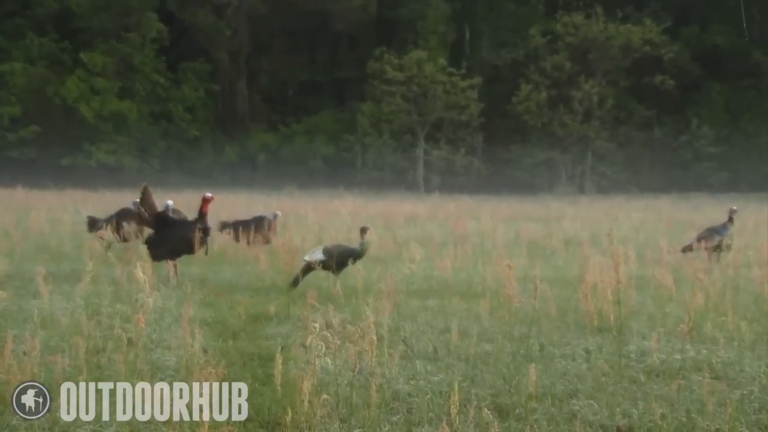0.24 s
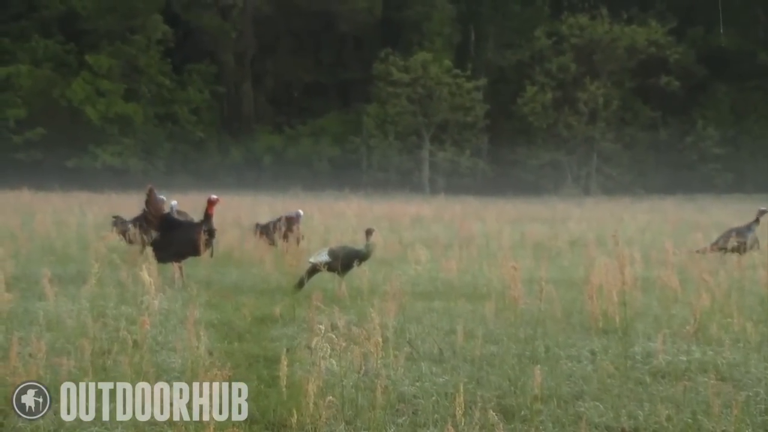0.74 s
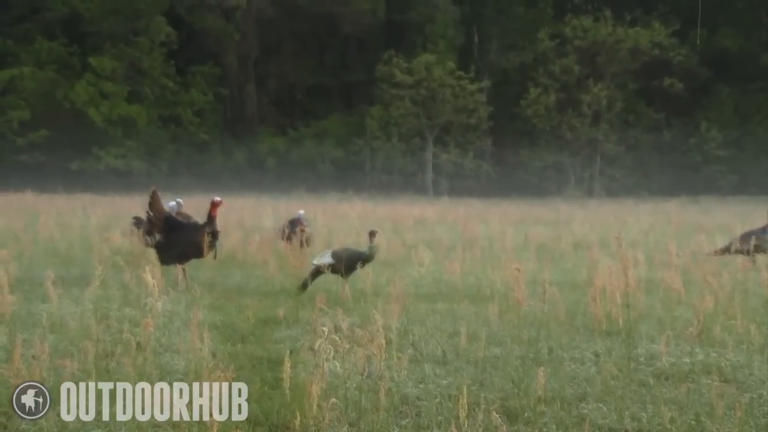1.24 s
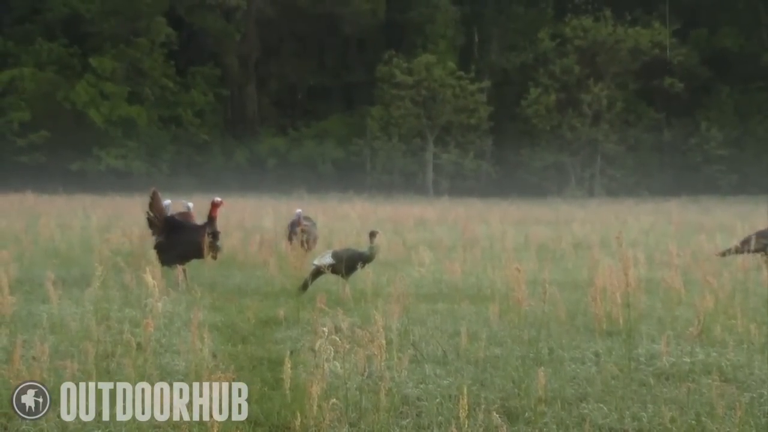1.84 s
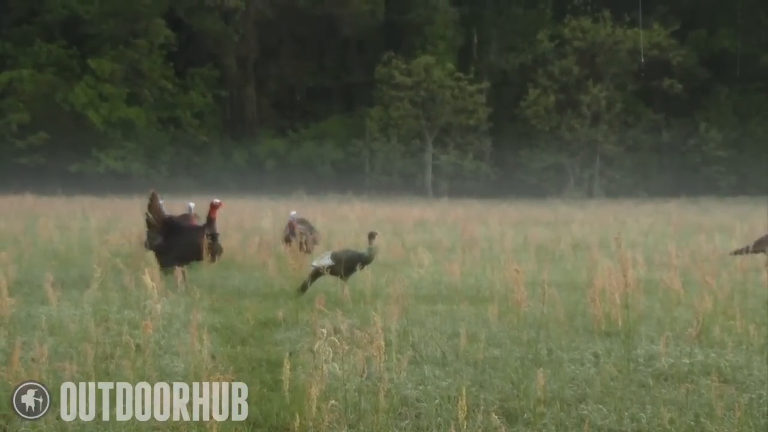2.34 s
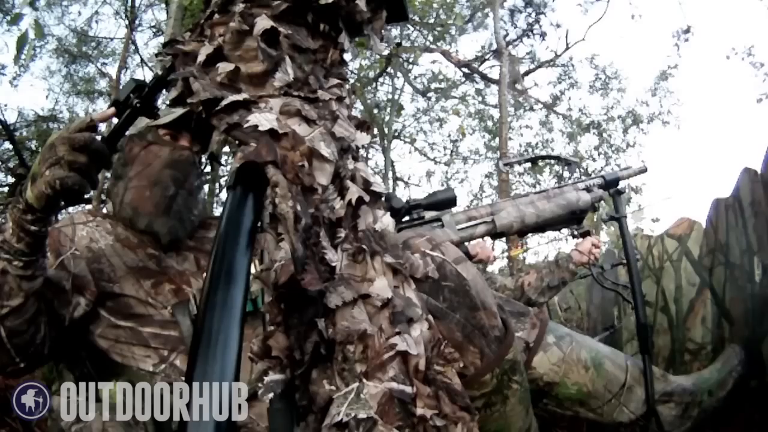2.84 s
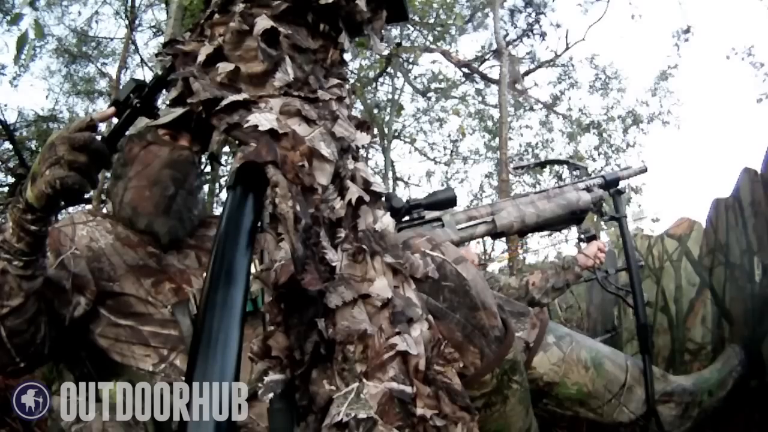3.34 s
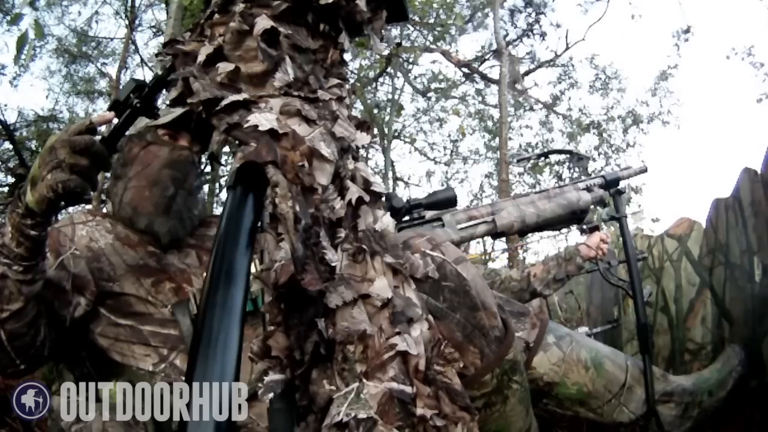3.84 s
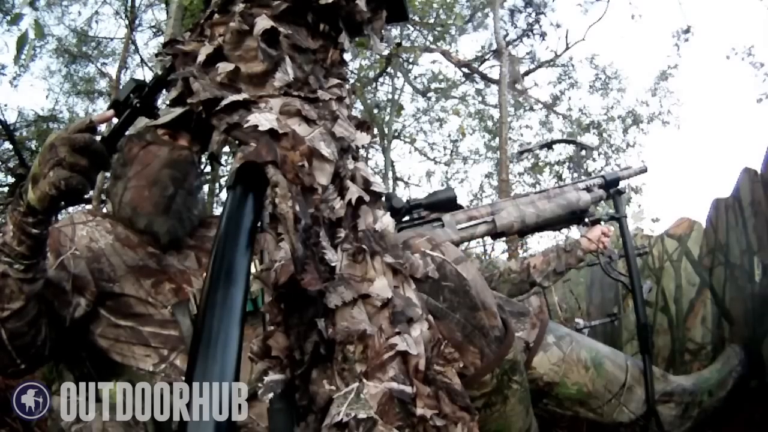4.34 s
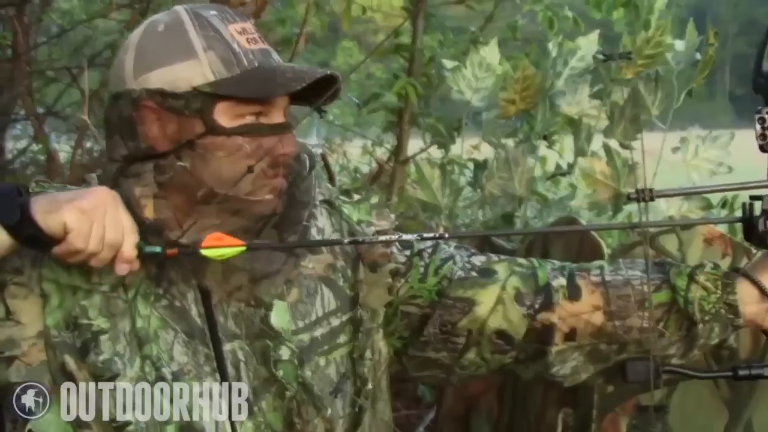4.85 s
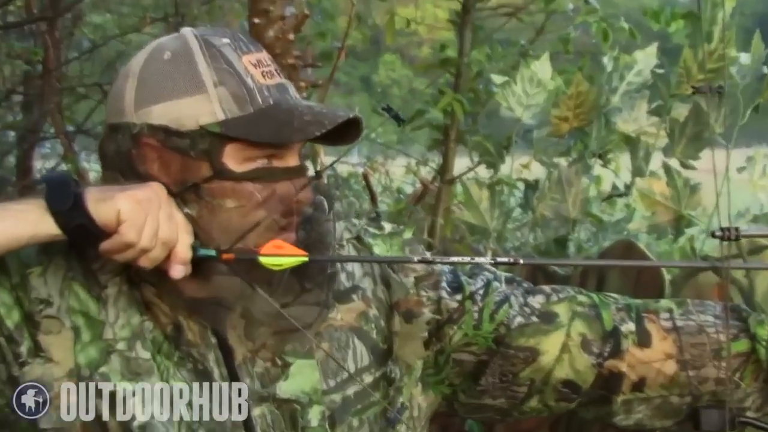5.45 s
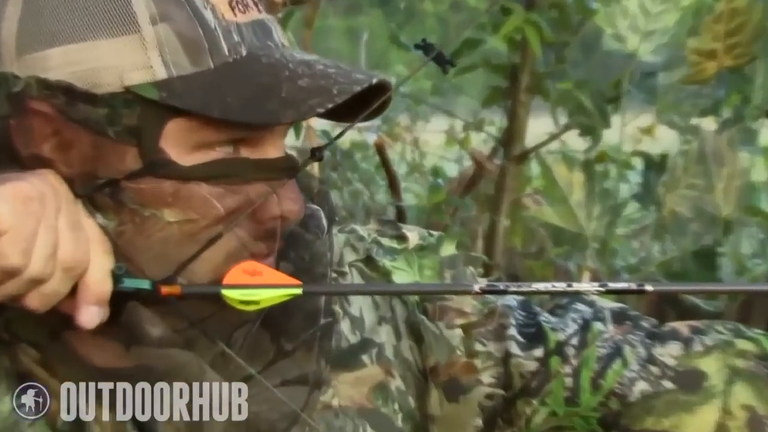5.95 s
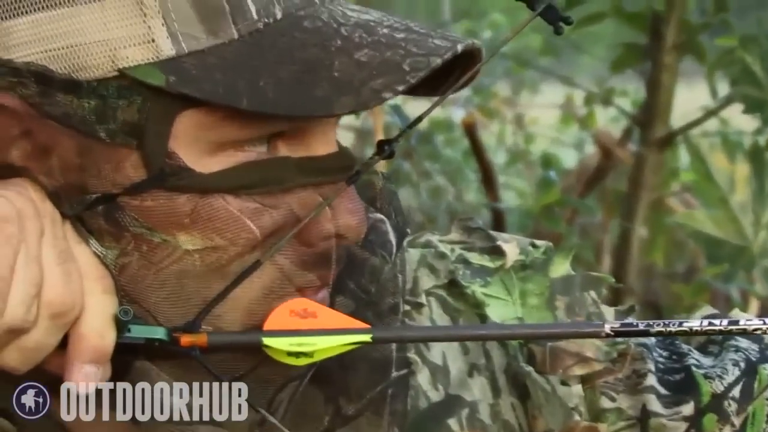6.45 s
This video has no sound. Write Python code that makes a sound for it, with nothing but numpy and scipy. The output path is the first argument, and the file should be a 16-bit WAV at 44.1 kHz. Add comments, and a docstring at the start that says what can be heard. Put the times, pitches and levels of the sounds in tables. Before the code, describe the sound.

Close, dry-sounding turkey yelps dominate the first half, in two evenly paced runs swelling from soft and clear to loud and raspy. Tiny gliding songbird notes sit far behind. Once the yelping stops, the quiet outdoor background emerges: steady low hum, soft air, sparse chirps, small twig-like ticks and knocks, and late on a hoarse, distant bird rattle.

```python
"""At the edge of a wood, a run of wild turkey yelps, growing louder and harsher overall, is heard twice. Each
yelp is a pulsed tone that dips in pitch and breaks into a rasp, shaped by resonances and hollows; the trees
return a faint diffuse tail. Far off, small birds sing gliding tones and a hoarse bird calls in strings of noise
notes. Soft knocks are damped resonances. Beneath lie a low hum of sine tones and the filtered noise of quiet
air."""
import sys
import numpy as np
from scipy import signal
from scipy.fft import rfft, irfft
from scipy.io import wavfile
from scipy.ndimage import uniform_filter1d

SR = 44100
rng = np.random.default_rng(int(sys.argv[2]) if len(sys.argv) > 2 else 0)


def master(y):
    """Save y as 16-bit WAV."""
    cut = np.clip(np.atleast_2d(y).T, -1, 1)
    pcm = np.round(cut * 32767)  # scale
    wavfile.write(sys.argv[1], SR, pcm.astype(np.int16))


N = 294676
TIME = np.arange(N) / SR


def undb(db):
    """Level is logarithmic: decibels to amplitude gain."""
    return 10 ** (np.asarray(db) / 20)


def unit(x):
    """Normalise the mean power: scale to an rms of one."""
    return x / np.sqrt(np.mean(x ** 2) + 1e-20)


def add(out, start, x):
    """Superposition: mix a sound in at a time in seconds."""
    i = max(int(start * SR), 0)
    out[i:i + len(x)] += x[:N - i]


def colour(x, points, peaks=()):
    """Minimum-phase filtering: a causal response is built from the cepstrum of a spectrum with peaks."""
    size = 8192
    f = np.arange(size // 2 + 1) * SR / size + 1
    hz, db = np.transpose(points)
    curve = np.interp(np.log(f), np.log(hz), db)
    for centre, width, gain in peaks:
        curve = curve + gain / (1 + (2 * (f - centre) / width) ** 2)
    # folding the cepstrum onto positive time makes the response causal
    cepstrum = irfft(np.log(undb(curve)))
    cepstrum[1:size // 2] *= 2
    cepstrum[size // 2 + 1:] = 0
    response = irfft(np.exp(rfft(cepstrum)))
    return signal.fftconvolve(x, response)[:len(x)]


def band(n, hz, width):
    """Band-limited noise: a bell-shaped spectrum; a narrow one around 0 Hz gives a slow fluctuation."""
    f = np.arange(SR // 2 + 1)
    spectrum = rfft(rng.standard_normal(SR)) * np.exp(-2 * ((f - hz) / width) ** 2)
    return unit(irfft(spectrum)[:n])


def turkey():
    """Vocal effort: the louder a yelp, the raspier and brighter it is, and the sooner it breaks."""
    # the yelps: start_s, length_s, lowest_pitch_hz, pitch_bend_share, level_db
    yelps = [(0.126, .049, 727.5, .38, -35), (.365, .08, 660, .27, -25), (0.617, .08, 683.3, 0.3, -23.5),
             (0.873, .07, 719, .3, -25), (1.139, .066, 733.7, 0.24, -20.5), (1.401, .059, 737, .26, -19),
             (1.752, 0.055, 663, .1, -41), (2.028, 0.053, 722.5, 0.47, -40),
             (2.266, 0.0795, 656.7, .27, -26), (2.519, .08, 689.6, 0.27, -24),
             (2.775, .07, 719, 0.31, -24.5), (3.041, .066, 733, .25, -20), (3.302, 0.06, 733.5, .26, -19.5)]
    clear_db, harsh_db = -36, -19  # levels between which effort rises to 1
    overtones_db, effort_overtones_db = -5.5, 5.5  # tilt without effort, and what full effort adds
    break_s, break_sooner_s = .031, .014  # delay of the rasp, and its shortening at full effort
    out = np.zeros(N)
    for start, length, low_hz, bend, db in yelps:
        effort = np.clip((db - clear_db) / (harsh_db - clear_db), .06, 1)
        bright_db = overtones_db + effort_overtones_db * effort ** 2
        breaks = (break_s - break_sooner_s * effort) / length
        add(out, start, undb(db) * yelp(length, low_hz, bend, bright_db, 0.85 * effort, breaks))
    return out


def yelp(length, low_hz, bend, bright_db, rasp, breaks, turn=.5, hiss_db=-12, slap_hz=210, edge_hz=3300,
         opening=0.69, evenness=0.34, dip_db=-0.5, dip_s=0.0022):
    """Source and filter: the syrinx sags in pitch, a second membrane rattles, and the windpipe resonates."""
    # air pressure through one yelp: share_of_length, level_db
    pressure = [(0, -32.5), (.13, -14), (.3, -1.5), (.5, 0), (.63, -1), (.74, 0), (.87, -8.5), (1, -20)]
    # broad colour of the voice: frequency_hz, level_db
    voice_colour = [(250, -51), (520, -27.5), (680, -6), (850, -5), (1020, -7), (1350, -2.5), (2050, -2),
                    (2350, -15), (3400, -13.5), (4100, -28.5), (5200, -48), (7000, -46), (9200, -33),
                    (15000, -55)]
    # sharp resonances of the windpipe, and hollows where an early reflection cancels the voice:
    # centre_hz, width_hz, gain_db
    resonances_and_hollows = [(472.4, 36, 27), (1088, 10, -23), (1370, 17, 6), (1616, 94, 6.5),
                              (1920, 49, -10.5), (2095, 48, 2), (2150, 180, -3), (2470, 59, 10),
                              (2554, 30, -10), (2628, 78, 10), (2773, 100, 10), (3110, 68, 6.5),
                              (3264, 120, -11.5), (3320, 86, 6.5), (3827, 74, -23.5), (4210, 55, 15.5),
                              (4700, 220, 11), (5800, 79, 18)]
    n = int(length * SR)
    u = np.arange(n) / n
    pressure_db = np.interp(u, *np.transpose(pressure))
    # roughness jumps at the break and eases near the end
    onset = np.interp(u - breaks, [-.04, 0], [.25, 1])
    easing = np.interp(u, [.78, .9], [1, .6])
    rough = rasp * onset * easing
    pitch_hz = low_hz * (1 + bend * (2 * (u - turn)) ** 2)
    pulses, phase = syrinx(pitch_hz, rough)
    # the rattle rings the upper resonances and leaves the fundamental clear
    rattle = slaps(n, breaks, slap_hz, scatter=.35, size_db=5.5, ring=0.0016)
    rattle = unit(np.tanh(rattle / 2))
    rattle = colour(rattle, [(700, -15), (1150, 0), (2200, 0), (4000, -3), (7000, -7)])
    rattle = 2.3 * rough * rattle
    # air hisses through once a cycle
    hiss = undb(hiss_db) * (1 + np.cos(phase)) * band(n, 0, SR)
    source = colour(pulses + rattle + hiss, [(1600, 0.015), (2200, bright_db), (4500, 2 * bright_db)])
    # at low pressure the membranes close softly and the top overtones fade
    lowpass = signal.butter(4, edge_hz, fs=SR, output="sos")
    soft = signal.sosfiltfilt(lowpass, source)
    source = soft + (source - soft) * undb(opening * pressure_db)
    voice = colour(source, voice_colour, resonances_and_hollows)
    # tone and rattle share one air stream, so their joint strength follows the pressure
    strength = np.sqrt(uniform_filter1d(voice ** 2, size=330) + 1e-12)
    # a clear yelp keeps some of the swell of an overtone that crosses a resonance
    voice = unit(voice / strength ** np.clip(evenness + rasp, 0, 1))
    # the level dips slightly and briefly at the break
    dip = dip_db * rasp ** 2 * np.exp(-((u - breaks) * length / dip_s) ** 2)
    return voice * undb(pressure_db + dip) * signal.windows.tukey(n, .08)


def syrinx(hz, rough, jitter=0.1, beat_hz=210, beat_width=260, shimmer=0.53):
    """Frequency and amplitude modulation: roughness makes the pitch and overtone strength flutter."""
    n = len(hz)
    flutter = (0.017 + jitter * rough) * band(n, beat_hz, beat_width)
    phase = 2 * np.pi * np.cumsum(hz * (1 + flutter)) / SR
    overtones = sum(np.cos(k * phase) * (k * hz < .4 * SR) for k in range(2, 22))
    overtones = overtones * np.exp(shimmer * rough * np.tanh(band(n, 0, beat_width)))
    # the harder the bird pushes, the fuller the fundamental
    fundamental = (0.83 + 0.55 * rough) * np.cos(phase)
    return unit(overtones + fundamental), phase


def slaps(n, first, rate_hz, scatter, size_db, ring):
    """Irregular impulses: closures of a slack membrane, each a noise burst that decays exponentially."""
    chance = rng.standard_normal((40, 2))
    gaps = np.exp(scatter * chance[:, 0]) * SR / rate_hz
    at = (first * n + np.cumsum(gaps) - gaps[0]).astype(int)
    size = undb(size_db * np.tanh(np.r_[1, chance[1:, 1]]))
    impulses = np.bincount(at, size, n)[:n]
    bursts = signal.lfilter([1], [1, -np.exp(-1 / (ring * SR))], impulses)
    return unit(bursts * band(n, 0, SR))


def songbirds():
    """Motif repetition: small birds sing a few short patterns of gliding notes."""
    # the calls: start_s, level_db, motif
    song = [(.0, -71.5, "peep"), (.02, -52.5, "hook"), (.329, -61.5, "dip"), (0.577, -56, "rise"),
            (1.81, -76.5, "whistle"), (1.92, -59.5, "hook"), (2.229, -63.5, "dip"), (2.478, -56, "rise"),
            (4.498, -68.5, "peep"), (4.734, -67, "whistle"), (4.988, -68, "whistle"),
            (5.199, -67.5, "tsip"), (5.5, -59.5, "warble"), (5.8, -71, "low call"), (5.816, -53.5, "hook"),
            (6.121, -59, "slur"), (6.372, -57.5, "rise"), (6.423, -56, "fall")]
    # notes of each motif: delay_s, length_s, first_hz, middle_hz, last_hz, level_db, buzz_share
    motifs = { "hook": [(0, 0.01, 3540, 4300, 4870, -6.5, 0.2), (.009, 0.021, 5140, 5276, 4930, 0.5, 0.1),
              (.067, 0.0115, 4000, 3750, 3400, -3.5, 0.5), (.126, 0.0164, 3840, 3480, 3200, -7.5, .8)],
              "dip": [(0, .045, 3250, 3320, 3170, -1, .7), (.127, .08, 2380, 1790, 2060, 0, .15)],
              "rise": [(0.0026, 0.039, 2880, 3520, 4470, 2.5, 0.3)],
              "fall": [(0, .028, 5500, 4560, 3500, -1, 0.49), (.019, .05, 3680, 2980, 2730, -4, .08)],
              "slur": [(0, .022, 3440, 3330, 3070, 0.5, 0.26), (.026, .093, 3000, 2700, 2490, -4, .7),
              (.182, .04, 3200, 3340, 3300, -10, .6)], "whistle": [(0, 0.167, 2270, 2380, 2388, 1.5, 0),
              (.09, 0.041, 2740, 2980, 3100, -4.5, 0.14)], "peep": [(0, .055, 2280, 2365, 2400, 0, .03)],
              "low call": [(0, .25, 1130, 1260, 1400, 0, .25)],
              "warble": [(0, .058, 3130, 2764, 2570, -4.5, .55), (.049, 0.043, 3580, 3370, 3300, -3.5, .6),
              (.086, .051, 4160, 4000, 3750, -6, .4), (.16, .064, 3750, 3870, 4300, -7.5, .55)],
              "tsip": [(0, 0.02, 5600, 5760, 6270, -3.5, .6), (.029, 0.016, 6100, 6040, 5700, 2.5, .2)]}
    out = np.zeros(N)
    for start, db, motif in song:
        for delay, length, first, middle, last, note_db, buzz in motifs[motif]:
            note = whistle(length, [first, middle, last], buzz)
            add(out, start + delay, undb(db + note_db) * note)
    return out


def whistle(length, pitches, buzz, buzz_depth=0.088, buzz_width=700):
    """Frequency modulation: a sine glides through three pitches while noise on its pitch adds buzz."""
    u = np.linspace(0, 1, int(length * SR))
    hz = np.polyval(np.polyfit([0, .5, 1], pitches, 2), u)
    hz = hz * (1 + buzz_depth * buzz * band(len(u), 0, buzz_width))
    envelope = np.sqrt(2 * np.abs(np.sin(np.pi * u)))
    return envelope * np.sin(2 * np.pi * np.cumsum(hz) / SR)


def far_call(centre_hz=1650, spread=0.16, note_width=400, grain_db=2, note_s=0.02, taper=0.2):
    """Granular noise: a hoarse bird's bursts are overlapping short noise bands on wandering pitches."""
    # the rattling bursts: start_s, length_s, level_db
    bursts = [(6.008, 0.13, -65.5), (6.158, 0.12, -58), (6.386, 0.096, -69.5)]
    # their spectrum: frequency_hz, level_db
    call_colour = [(700, -10), (1200, 1.5), (1500, -1), (1800, 4.5), (2200, -5.5), (2800, -23)]
    out, shape = np.zeros(N), np.hanning(int(note_s * SR))
    for start, length, db in bursts:
        notes, n = np.zeros(N), int(length * SR)
        chance = np.clip(rng.standard_normal((16, 2)), -2, 2)
        for at, (pitch, size) in zip(np.arange(0, length, .012), chance):
            grain = shape * band(len(shape), centre_hz * np.exp(spread * pitch), note_width)
            add(notes, at, undb(grain_db * size) * grain)
        burst = unit(colour(notes[:n], call_colour))
        add(out, start, undb(db) * burst * signal.windows.tukey(n, taper))
    return out


def far_chips(count=14, centre_hz=3700, spread=.17, db=-72.5, length=.028, fall=.12, begins=3.8):
    """Random timing in equal slots: faint falling chips from more distant birds."""
    out = np.zeros(N)
    for k, (when, pitch, size) in enumerate(rng.random((count, 3))):
        hz = centre_hz * np.exp(spread * (2 * pitch - 1))
        start = begins + (TIME[-1] - begins) * (k + when) / count
        chip = whistle(length, [hz * (1 + fall), hz, hz * (1 - fall / 2)], .2)
        add(out, start, undb(db) * (.5 + size) * chip)
    return out


def knocks(attack=0.00033):
    """Damped resonance: each soft knock or twig tick is one decaying mode with a snap of noise."""
    # the knocks: start_s, pitch_hz, decay_s, level_db, snap_db (relative to the tone's amplitude)
    strikes = [(1.122, 235, .009, -40, -30), (3.024, 235, .009, -40, -30), (4.283, 1720, .005, -48, -6),
               (5.331, 560, .005, -42, -3), (5.453, 360, .010, -58, -15), (5.671, 850, .005, -48, 3)]
    # spectrum of the snap: frequency_hz, level_db
    snap_colour = [(120, 9.5), (800, 1.5), (1400, -13), (3000, -8.5), (6500, -17), (10000, -32)]
    out, t = np.zeros(N), TIME[:SR // 10]
    for start, hz, decay, db, snap_db in strikes:
        snap = unit(colour(rng.standard_normal(len(t)), snap_colour))
        body = np.sin(2 * np.pi * hz * t) + undb(snap_db) * snap
        add(out, start, undb(db) * body * (1 - np.exp(-t / attack)) * np.exp(-t / decay))
    return out


def hum(fade=0.017):
    """Superposed pure tones: a low hum wavers in level, and a deeper tone joins late."""
    # the tones: frequency_hz, level_db (rms, before the waver), start_s
    partials = [(149.9, -48.8, -1), (211, -68, -1), (113, -58, 6.29)]
    # the waver of the whole hum: time_s, gain_db
    waver = [(4.3, -1.5), (4.8, -3.5), (5.2, -1.5), (5.6, -4.5), (6.6, -3.5)]
    tones = np.zeros(N)
    for hz, db, start in partials:
        fade_in = np.clip((TIME - start) / fade, 0, 1)
        tones += undb(db) * fade_in * np.sin(2 * np.pi * hz * TIME)
    return np.sqrt(2) * tones * undb(np.interp(TIME, *np.transpose(waver)))


def rumble(db=-67, swell_db=3):
    """Filtered noise: a faint low rumble that grows after the yelps and stays raised."""
    # its spectrum: frequency_hz, level_db
    rumble_colour = [(20, -16), (60, -7.5), (125, 1), (240, -6), (330, -9), (700, -42)]
    level_db = db + np.interp(TIME, [4.3, 5.8], [0, swell_db])
    return undb(level_db) * unit(colour(rng.standard_normal(N), rumble_colour))


def air(mean_db=-62):
    """Broadband noise: soft outdoor noise whose level, set by the part above 300 Hz, follows a drawn curve."""
    # its spectrum: frequency_hz, level_db
    air_colour = [(160, -26), (280, -6.5), (659, -2.5), (1290, -9.5), (2360, -13.5), (2530, -11),
                  (3200, -15.5), (3840, -17), (4180, -18.5), (15500, -29)]
    # hand-drawn level curve, of which only the departure from the mean counts: time_s, level_db
    level_curve = [(0.0, -73), (0.43, -72), (1.43, -71), (1.58, -71.5), (1.9, -76.5), (3.2, -69.5),
                   (3.83, -74.5), (6.68, -73)]
    noise = colour(rng.standard_normal(N), air_colour)
    highpass = signal.butter(4, 300, "high", fs=SR, output="sos")
    above_hum = signal.sosfilt(highpass, noise)
    level_db = np.interp(TIME, *np.transpose(level_curve))
    return noise / above_hum.std() * undb(mean_db + level_db - level_db.mean())


def woods(x, t60, wet_db, build=.02, treble_db=-6):
    """Diffuse reverberation: trunks and leaves scatter a sound into an exponentially decaying tail."""
    t = TIME[:SR]
    tail = rng.standard_normal(SR) * undb(-60 * t / t60) * (1 - np.exp(-t / build))
    tail = tail / np.sqrt(np.sum(tail ** 2))
    tail = colour(tail, [(1500, 0.0025), (8000, treble_db)])
    return x + undb(wet_db) * signal.fftconvolve(x, tail)[:N]


def scene():
    """Distance by reverberation: the near turkey has faint reflections, the far birds strong ones."""
    # a short rustle of reflections, then a faint late wash
    near = woods(turkey(), t60=0.14, wet_db=-27.5, build=0.0049, treble_db=14.5)
    near = woods(near, t60=0.91, wet_db=-40, build=0.026, treble_db=-4)
    far = woods(songbirds() + far_chips() + far_call(), t60=.65, wet_db=-2, build=.005, treble_db=-6)
    return (near + far + knocks() + hum() + rumble() + air())[None]


def record(dry, top_hz=15300):
    """Low-pass filtering: a steep elliptic filter removes the highest treble."""
    lowpass = signal.ellip(10, .2, 70, top_hz, fs=SR, output="sos")
    return signal.sosfilt(lowpass, dry)


dry = scene()
out = record(dry)
master(out)
```